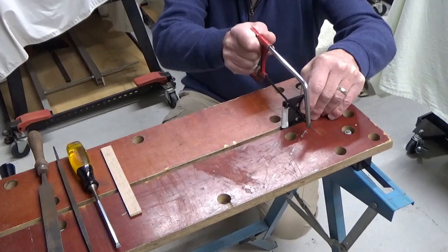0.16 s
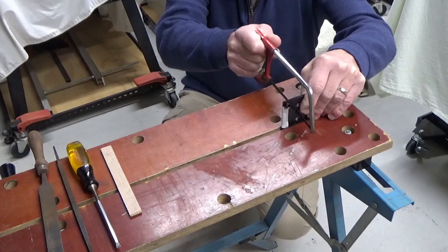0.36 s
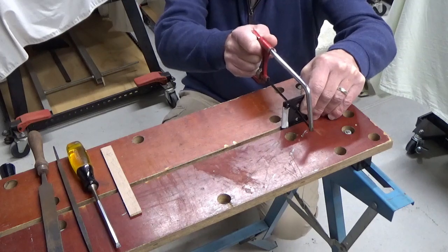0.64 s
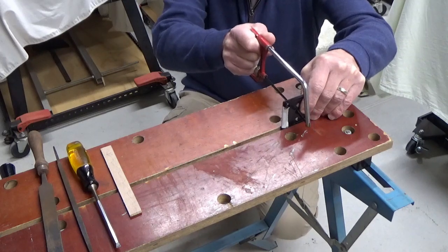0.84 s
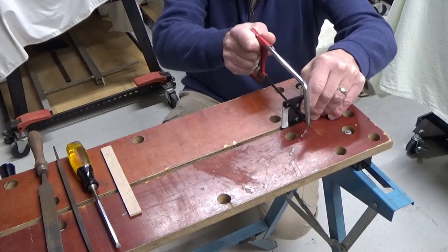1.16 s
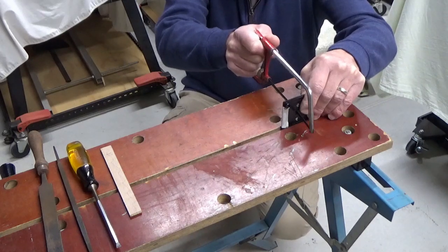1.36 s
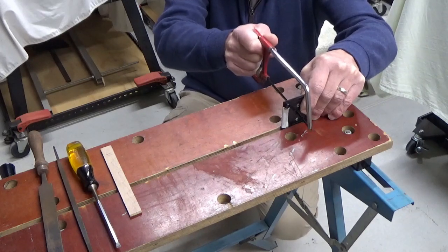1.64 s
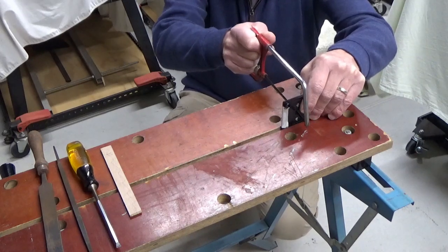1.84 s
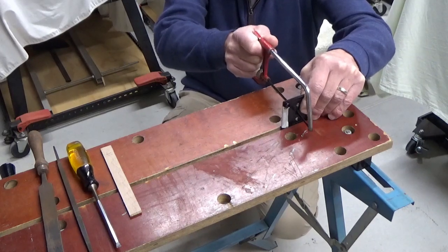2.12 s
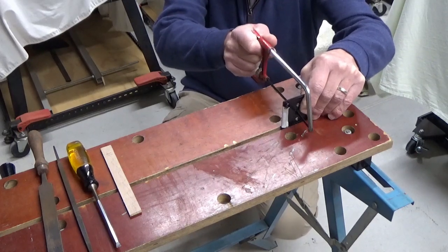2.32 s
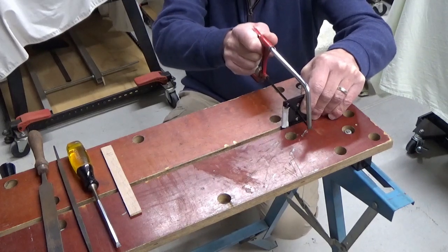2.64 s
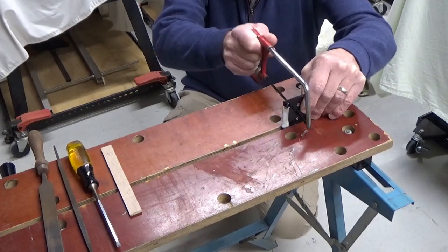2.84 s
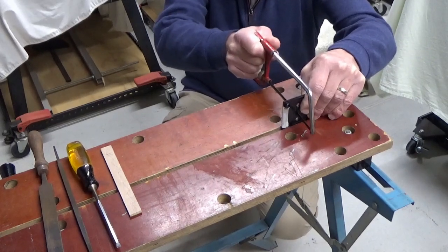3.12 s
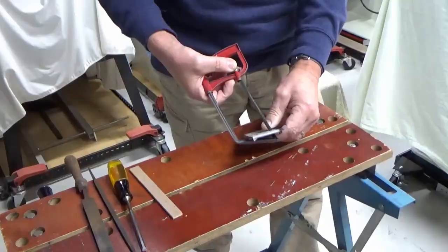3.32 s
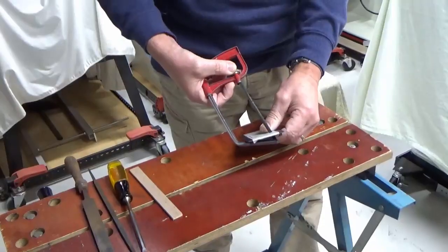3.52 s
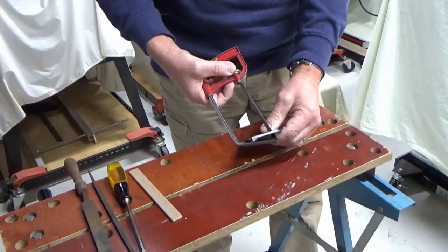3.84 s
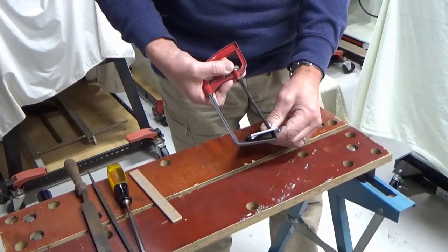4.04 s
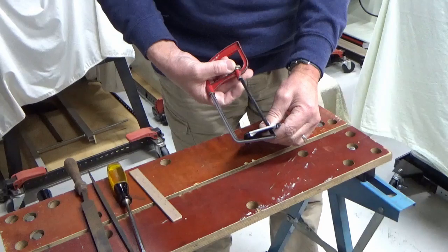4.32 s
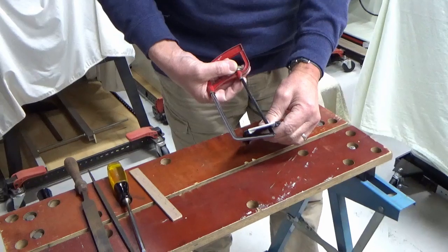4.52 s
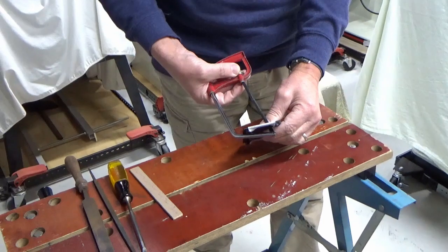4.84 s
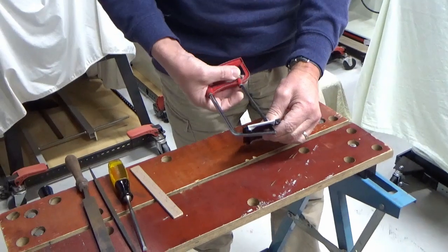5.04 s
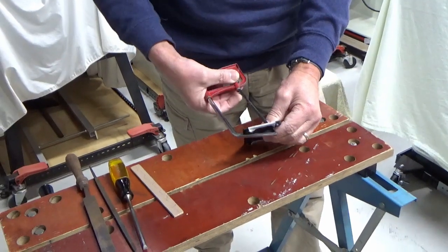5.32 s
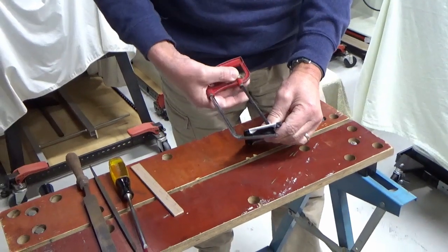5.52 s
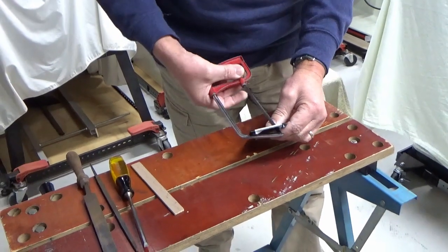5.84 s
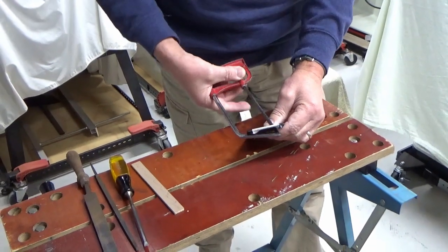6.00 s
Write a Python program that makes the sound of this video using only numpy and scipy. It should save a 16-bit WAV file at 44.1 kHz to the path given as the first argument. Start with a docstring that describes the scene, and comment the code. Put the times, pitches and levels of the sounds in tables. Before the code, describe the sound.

Brisk, even strokes of a small hand saw rasp through clamped plastic in a workshop, stop abruptly, then light taps and a soft rub follow.

```python
"""A coping saw cuts a clamped piece of plastic at a workbench, six strokes a second, in a small workshop.
Teeth chip through the plastic and drive the resonances of blade and frame; some snag with a crack.
The piece knocks in its clamp and the bench drones. The sawing stops abruptly with a brief dip in level;
light taps and a grainy rub of saw and piece follow. Room hum, hiss and a faint electric chirp lie beneath."""
import sys
import numpy as np
from scipy import signal
from scipy.fft import rfft, irfft
from scipy.io import wavfile
from scipy.ndimage import map_coordinates

SR = 44100
rng = np.random.default_rng(int(sys.argv[2]) if len(sys.argv) > 2 else 0)


def to_wav(s):
    """Save 16-bit WAV."""
    ch = np.atleast_2d(s).T  # columns
    pcm = np.round(np.clip(ch, -1, 1) * 32767)  # PCM
    wavfile.write(sys.argv[1], SR, pcm.astype(np.int16))


N = 272052
TIME = np.arange(N) / SR
HZ = np.fft.rfftfreq(N, 1 / SR)
STOP_S = 3.318  # the sawing ends
TOP_HZ = 11050  # upper edge of the sound


def undb(db):
    """Decibels to gain."""
    return 10 ** (np.asarray(db) / 20)


def unit(x):
    """Scale to rms 1."""
    return x / np.sqrt(np.mean(x ** 2))


def contour(points, hz=HZ):
    """Read (Hz, value) points on a log-frequency axis."""
    f, value = np.transpose(points)
    return np.interp(np.log(hz + 1), np.log(f), value)


def colour(x, db):
    """Filter by a gain in dB for each frequency."""
    return irfft(rfft(x) * undb(db), N)


def hiss(db):
    """Noise of a given colour, rms 1."""
    return unit(colour(rng.standard_normal(N), db))


def walk(rate):
    """Random wander with a new target rate times a second, spread about 1."""
    knots = rng.standard_normal(N // 10)
    return 1.2 * np.interp(TIME * rate, np.arange(len(knots)), knots)


def treble(x, hz):
    """The part of a sound above hz, with a gentle edge."""
    return signal.sosfiltfilt(signal.butter(2, hz, "high", fs=SR, output="sos"), x)


def split(x, hz):
    """The part of a sound above hz, with a steep edge."""
    return signal.sosfiltfilt(signal.butter(6, hz, "high", fs=SR, output="sos"), x)


def ring(x, response):
    """Pass a sound through an impulse response."""
    return signal.fftconvolve(x, response)[:N]


def blows(times, sizes):
    """A train of single-sample pushes."""
    samples = (np.asarray(times) * SR).astype(int).clip(0, N - 1)
    return np.bincount(samples, sizes, N)


# How long the workshop rings. Each row: frequency in Hz, time to fall 60 dB in seconds.
ROOM_DECAY = [(200, 0.48), (1500, 0.43), (4000, 0.41), (9000, 0.5)]
# Tone of the workshop's tail. Each row: frequency in Hz, level in dB.
ROOM_TONE = [(100, 1.5), (500, 11.5), (1300, 2.5), (2500, 1.5), (4500, 1.5), (9000, -9)]


def reflections(near_db, near_s, far_db, build_s=0.004):
    """Quick echoes from bench and clutter, then a tail with its own tone and decay in each band."""
    near = unit(rng.standard_normal(N) * np.exp(-TIME / near_s) * (TIME > .001))
    spectrum = rfft(rng.standard_normal(N))
    f, t60 = np.transpose(ROOM_DECAY)
    far = 0
    for share, decay in zip(np.eye(len(f)), t60):
        band_gain = contour(np.c_[f, share]) * undb(contour(ROOM_TONE))
        far = far + irfft(spectrum * band_gain, N) * undb(-60 * TIME / decay)
    far = unit(far * (1 - np.exp(-TIME / build_s)))
    return (undb(near_db) * near + undb(far_db) * far)[:SR] / np.sqrt(N)


def in_room(x, to_mid, to_side):
    """Direct sound in the centre, with its echoes spread to left and right."""
    mid = x + ring(x, to_mid)
    side = ring(x, to_side)
    return np.array([mid + side, mid - side])


# Resonances of blade, frame and clamped piece.
# Each row: frequency in Hz, width in Hz before a lower limit, lift in dB.
SAW_RESONANCES = [(855, 140, 3.5), (965, 28, 5), (1150, 97, 8.5), (1324, 83, 8.5), (1440, 66, 6.5),
                  (1592, 27, 3.5), (1572, 84, 5.5), (1640, 38, 3.5), (1790, 80, 4), (2088, 19, 5),
                  (2170, 19, 4.5), (2295, 43, 6.5), (2440, 25, 6), (2890, 30, 0.5), (2850, 45, -0.5),
                  (3230, 32, 0.5), (3844, 170, 5), (4330, 45, 5), (5362, 31, 8.5), (6080, 190, 5),
                  (6400, 110, 5), (6750, 70, 6), (7750, 24, 4), (7770, 50, -2.5), (7800, 150, 4),
                  (7960, 120, -0.5), (9100, 70, -3.5), (9420, 77, 7)]


def saw_body(points, size=4096):
    """Causal response of the saw: its resonances stand on a broad colour; energy 1."""
    db = contour(points)
    for f, width, lift in SAW_RESONANCES:
        # every resonance is kept broad enough to ring only briefly
        ring_width = max(width, 30 + f / 150)
        db = db + lift / (1 + (2 * (HZ - f) / ring_width) ** 2)
    db = db - 40 * np.clip(HZ / TOP_HZ - 1, 0, 1)
    # folding the cepstrum forward in time makes the response start at once
    cepstrum = irfft(db * np.log(10) / 20, N)
    forward = (TIME > 0) * (TIME < TIME[-1] / 2)
    response = irfft(np.exp(rfft(2 * cepstrum * forward)), N)[:size]
    return response / np.linalg.norm(response)


# Tone of the room's rumble and hiss. Each row: frequency in Hz, level in dB.
AIR_TONE = [(25, -7), (45, -3), (68, 3), (95, -4), (160, 0), (230, -6), (350, -12), (600, -14), (950, -13),
            (1500, -18.5), (2200, -23), (4500, -28.5), (9000, -29.5), (11000, -34)]
# Stereo width of the air. Each row: frequency in Hz, side relative to mid in dB.
AIR_WIDTH = [(40, -28), (120, -34), (300, -12.5), (800, -7.5), (3000, -3), (10000, -9)]


def room_air(level_db=-54, bass_swell_db=3):
    """Low rumble, nearly alike left and right, its deepest part swelling slowly, under a wider hiss."""
    mid = hiss(contour(AIR_TONE))
    deep = mid - treble(mid, 57)
    swell = undb(bass_swell_db * np.clip(TIME - 4.5, -.5, 1))
    mid = mid + (swell - 1) * deep
    side = colour(hiss(contour(AIR_TONE)), contour(AIR_WIDTH))
    return undb(level_db + .5 * walk(4.4)) * np.array([mid + side, mid - side])


def faint_whirr(hz=3460, db=-58, pulse_s=0.0035, weak_db=-3, whine_hz=6500, whine_db=-82):
    """A faint electric chirp, 25 a second, strong and weak in turn, with a thin steady whine."""
    age = (TIME - .010) % .08
    strong = np.exp(-((age - .02) / pulse_s) ** 2)
    weak = undb(weak_db) * np.exp(-((age - .06) / pulse_s) ** 2)
    chirp = np.sin(2 * np.pi * np.cumsum(hz + 35 * walk(600)) / SR)
    whine = np.sin(2 * np.pi * whine_hz * TIME)
    return undb(db) * (strong + weak) * chirp + undb(whine_db) * whine


# The piece slides under the fingers along the blade.
# Each row: time in seconds, level in dB, gain above 5.2 kHz in dB.
SLIDE_COURSE = [(5.28, -79, -4), (5.37, -60, -6), (5.48, -60, -1), (5.6, -63, 0), (5.72, -62, 6),
                (5.9, -64, 2.5), (6.05, -69, 7), (6.17, -77, 0)]
# Tone of the rub. Each row: frequency in Hz, level in dB.
SLIDE_TONE = [(300, -2), (700, -4), (1200, -4), (1600, 4.5), (1850, -2), (2250, -2), (2650, -8), (3400, 4),
              (3900, -2.5), (4400, -2.5), (5200, -15), (7200, -17), (7800, -6), (8400, -11), (9000, -7),
              (10500, -28)]


def sliding(rough_db=2, grain_db=3):
    """A soft rub: noise made grainy by fast level flicker, uneven by slower, with shifting brightness."""
    s, *columns = np.transpose(SLIDE_COURSE)
    db, bright_db = (np.interp(TIME, s, column) for column in columns)
    grains = rng.standard_normal(N) * undb(grain_db * walk(500))
    rub = unit(colour(grains, contour(SLIDE_TONE)))
    rub = rub + (undb(bright_db) - 1) * split(rub, 5200)
    return undb(db + rough_db * walk(50)) * rub


# Fingers, piece and saw frame touch. Each row: start in seconds, level in dB before the tone gains,
# gain below 1.9 kHz in dB, gain above 4.8 kHz in dB.
TOUCHES = [(2.458, -29, -12, -14), (3.375, -43, -1, 9), (4.6382, -33.5, -16, -6), (4.8645, -29, -17, 1.5),
           (4.867, -28.5, -22, 2), (4.888, -38, -23, 7), (5.2866, -40.5, -13, 8.5),
           (5.3526, -31.5, -2.5, -4), (5.3605, -31.5, 4.5, -5), (5.455, -50, 11, -12),
           (5.9862, -38, 11.5, -12), (5.994, -55, 10, -10), (6.0350, -39.5, -17, 6.5)]
# Tone of a tap under the saw's resonances. Each row: frequency in Hz, level in dB.
TAP_TONE = [(150, -14), (600, 11), (1500, 8), (2400, 5.5), (4500, 9.5), (6000, 0), (9000, 6.5),
            (11000, -4.5)]


def handling(scuff_db=-20, scuff_s=0.0066):
    """Light taps ring saw and piece, each a single push with a short noisy scuff."""
    out = np.zeros(N + SR)
    response = saw_body(TAP_TONE)
    response = response / np.abs(response).max()
    t = TIME[:len(response)]
    for s, db, body_db, bright_db in TOUCHES:
        scuff = rng.standard_normal(len(t)) * np.exp(-t / scuff_s)
        touch = (t == 0) + undb(scuff_db) * scuff
        # silence in front leaves room for the two-way filters
        tap = np.pad(signal.fftconvolve(touch, response), (len(t), 0))
        tap = tap + (undb(body_db) - 1) * (tap - split(tap, 1900))
        tap = tap + (undb(bright_db) - 1) * split(tap, 4800)
        first = int(s * SR) - len(t)
        out[first:first + len(tap)] += undb(db) * tap
    return out[:N]


def bench_rumble(db=-50, ease_db=3):
    """The shaken bench drones as low noise, a little less towards the end of the sawing."""
    drone = hiss(contour([(25, -1.5), (45, -2), (70, -6), (110, 1), (200, -5.5), (400, -12),
                          (1000, -16.5), (4000, -47)]))
    return undb(db - ease_db * TIME / STOP_S + 2 * walk(9.1)) * drone


# The piece knocks in its clamp.
# Each row: time in seconds, level in dB before the knock gain, contact time in seconds.
CLAMP_KNOCKS = [(0.634, -33, .0015), (2.9302, -18.5, .00014), (2.9337, -23, .0006), (3.058, -23, .0021)]
# Modes of clamp and bench top. Each row: frequency in Hz, level in dB, time to fall 60 dB in seconds.
BENCH_RESONANCES = [(140, -15, 0.066), (234.25, -10, .045), (345, -11, 0.023), (490, -10, 0.022),
                    (700, -15, 0.031), (845, 1, 0.03), (1150, -6, 0.03), (1330, -5, .035), (2020, -7, .015),
                    (3880, -9, .024)]


def knocks(gain_db=2, clatter_db=-9):
    """The piece rocks in the clamp and thumps the bench top; a longer contact is duller."""
    t = TIME[:SR // 4]
    response = np.zeros(len(t))
    for f, db, t60 in BENCH_RESONANCES:
        response += undb(db) * np.sin(2 * np.pi * f * t) * undb(-60 * t / t60)
    # many small, quickly damped modes of the clamp fill the space between the strong ones
    clatter = hiss(contour([(100, -3), (250, 0), (560, -9), (850, 2), (1300, 0), (2500, -9),
                            (4000, -7), (10000, -17)]))[:len(t)]
    response = response + undb(clatter_db) * clatter * np.exp(-t / .005)
    push = np.zeros(N)
    for s, db, contact in CLAMP_KNOCKS:
        shape = np.exp(-(np.pi * (TIME - s) / contact) ** 2)
        push += undb(db + gain_db) * shape / shape.sum()
    return ring(treble(push, 87), response / np.abs(response).max())


# Cutting and return strokes in turn.
# Each row: start in seconds, stroke level in dB, catch of the teeth at the turn in dB before the snag gain.
SAW_STROKES = [(-0.03, -28.5, -22), (0.117, -29.5, -25.5), (0.294, -27.5, -16), (0.453, -27, -28),
               (0.635, -27, -18), (0.8008, -30, -17), (0.9808, -27, -10.5), (1.139, -29.5, -23.5),
               (1.312, -28.5, -17), (1.471, -28, -32), (1.6541, -31.5, -16.5), (1.822, -29.5, -14.5),
               (1.9913, -27, -9.5), (2.156, -30, -36), (2.3284, -31, -19), (2.496, -30, -29),
               (2.663, -28.5, -28), (2.8375, -28.5, -18), (3.0027, -26.5, -24), (3.1664, -28.5, -10)]
# The loudest snags, where a tooth catches and breaks free.
# Each row: time in seconds, level in dB before the snag gain.
HARD_SNAGS = [(0.0157, -9), (0.1747, -11), (0.6608, -10.5), (0.6697, -11), (0.8722, -12), (1.0199, -9.5),
              (1.3304, -7), (1.365, -12.5), (1.6753, -3.5), (1.8678, -16), (1.8929, -8), (2.0344, -10.5),
              (2.1945, -12.5), (2.3502, -8.5), (2.6873, -9.5), (3.035, -9)]


def catches(count=2, delay_s=.04, spread_s=.014, over_db=8.5, scatter_db=2.5):
    """Teeth catch at each turn, by chance twice around each stroke's middle, and now and then very hard."""
    start, stroke_db, turn_db = np.transpose(SAW_STROKES)
    pushes = blows(start, undb(turn_db))
    for _ in range(count):
        when, strength = rng.standard_normal((len(start), 2)).clip(-2, 2).T
        snag_db = stroke_db + over_db + scatter_db * strength
        pushes += blows(start + delay_s + spread_s * when, undb(snag_db))
    s, db = np.transpose(HARD_SNAGS)
    return pushes + blows(s, undb(db))


# Broad tone of the bite, with the teeth and against them.
# Each row: frequency in Hz, cutting level in dB, return level in dB.
BITE_TONE = np.array([(60, -26.5, -35), (218, -1.5, -13.5), (375, -5, -18), (667, -12.5, -18.5),
                      (1084, -4, -7), (1740, 0.5, -1.5), (2350, 1, -5), (2920, 0, 1.5), (3370, -5.5, -4.5),
                      (5300, -9.5, -12), (7300, -7, -11.5), (8900, -2.5, -8), (10130, -11, -13),
                      (11470, -20.5, -33.5)])


def snags(gain_db=-2, bright_db=3, splinter_db=-12, splinter_s=0.00089):
    """A caught tooth lets go with a hard, bright crack and a millisecond of splintering."""
    cracks = undb(gain_db) * catches()
    splinters = ring(cracks, np.exp(-TIME[:SR // 50] / splinter_s)) * rng.standard_normal(N)
    # too brief to shake the bench much, so the bass is weak
    response = saw_body([(f, db - 7 / (1 + (f / 600) ** 2)) for f, db, _ in BITE_TONE])
    response = response + (undb(bright_db) - 1) * treble(response, 5500)
    return ring(cracks + undb(splinter_db) * splinters, response / np.abs(response).max())


def teeth(speed, tooth_hz, jitter=.25, scatter_db=4, grit_db=-1, grit_scatter_db=4):
    """Each tooth that passes breaks off a chip, and drags through grit until the next one."""
    phase = np.cumsum(tooth_hz * np.sqrt(speed) * np.exp(jitter * walk(200))) / SR
    # a tooth can only hold so large a chip
    size = undb(scatter_db * np.minimum(rng.standard_normal(N), 1.3))
    chips = np.diff(np.floor(phase), prepend=0) * size
    chips = chips / np.sqrt(np.average(chips ** 2, weights=speed))
    roughness = undb(grit_scatter_db * np.minimum(walk(1500), 2))
    grit = rng.standard_normal(N) * roughness * np.exp(-1.2 * (phase % 1))
    return (chips + undb(grit_db) * unit(grit)) / np.hypot(1, undb(grit_db))


def blade_echo(x, travel, near_s=0.000377, span_s=0.001116, share=0.24, sway=0.13):
    """Waves return from the end of the blade; the delay follows the cut along it, so the colour shifts."""
    delay = near_s + span_s * np.clip(travel + sway * walk(7), 0, 1.5)
    echo = map_coordinates(x, [(TIME - delay) * SR], order=3)
    return (x + share * echo) / np.hypot(1, share)


def sawing(strokes, bite, treble_db, rise_s, half_s, direction, tooth_hz, gain_db, speed_bright_db,
           grip_s, grab, grab_s):
    """Strokes one way: the blade grips at the turn, speeds up and slows; speed sets force and brightness."""
    speed, force, travel = np.zeros((3, N))
    for start, db, _ in strokes:
        age = np.maximum(TIME - start, 0)
        grip = 1 - np.exp(-age / grip_s)
        bell = grip * np.exp(-((age - rise_s) / half_s) ** 2)
        speed += bell
        # the teeth dig in at once after the turn
        force += undb(db) * (bell + grab * grip * np.exp(-age / grab_s))
        travel = np.where(age > 0, np.cumsum(bell) / bell.sum(), travel)
    chipping = teeth(speed, tooth_hz) * force
    drive = blade_echo(chipping, .5 + direction * (travel - .5))
    bright_db = treble_db * speed + speed_bright_db * (speed - 0.35)
    drive = drive + (undb(bright_db) - 1) * treble(drive, 6200)
    return undb(gain_db) * ring(drive, saw_body(bite))


def return_strokes():
    """The blade runs back against its teeth, its speed peaking later than in the cut."""
    return sawing(SAW_STROKES[1::2], BITE_TONE[:, ::2], treble_db=-1.6, rise_s=.046, half_s=.037,
                  direction=-1.0, tooth_hz=617.5, gain_db=0.24, speed_bright_db=8.0,
                  grip_s=.003, grab=0.71, grab_s=0.0069)


# Treble of the cutting strokes as the cut deepens.
# Each row: time in seconds, gain above 6.2 kHz at full speed in dB, before the speed brightening.
DEEPENING_TREBLE = [(0, -1.5), (.4, -3), (1.05, -4), (1.7, 1), (2.4, 3.5), (3.05, -0.5)]


def cutting_strokes():
    """The teeth bite forward, quick to grip and soon at their fastest."""
    treble_db = np.interp(TIME, *np.transpose(DEEPENING_TREBLE))
    return sawing(SAW_STROKES[::2], BITE_TONE[:, :2], treble_db, rise_s=.029, half_s=.040,
                  direction=0.96, tooth_hz=482.0, gain_db=0, speed_bright_db=4.0,
                  grip_s=.0005, grab=0.44, grab_s=0.0026)


def scene():
    """The saw sounds close over the droning bench; the handling carries more of the room."""
    # cutting strokes, return strokes and snags each get their own randomly drawn echoes
    saw = 0
    for x in (cutting_strokes(), return_strokes(), snags()):
        to_mid = reflections(near_db=-10.5, near_s=0.017, far_db=-12.5)
        to_side = reflections(near_db=-15.0, near_s=0.01, far_db=-20)
        saw = saw + in_room(x, to_mid, to_side)
    saw = saw + in_room(knocks(), reflections(near_db=-15, near_s=.005, far_db=-19),
                        reflections(near_db=-10, near_s=.005, far_db=-23))
    hands = in_room(handling() + sliding(), reflections(near_db=-5.5, near_s=0.014, far_db=-9),
                    reflections(near_db=-11, near_s=0.0087, far_db=-19))
    pan_db = -0.1  # left relative to right
    saw = saw * undb(np.array([[pan_db], [-pan_db]]) / 2)
    # the sawing ends abruptly, and the level dips for a moment
    working = TIME < STOP_S
    dip = np.interp(TIME - STOP_S, [-.003, 0, .008, .016], [1, .03, .03, 1])
    return dip * (working * (saw + bench_rumble()) + hands + faint_whirr() + room_air())


def record(dry):
    """Soft saturation rounds the sharpest peaks, and a steep low-pass cuts the top."""
    ceiling = .45
    low_pass = signal.ellip(10, .2, 70, TOP_HZ, fs=SR, output="sos")
    return signal.sosfilt(low_pass, ceiling * np.tanh(dry / ceiling))


dry = scene()
out = record(dry)
to_wav(out)
```